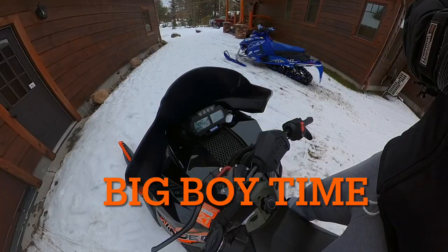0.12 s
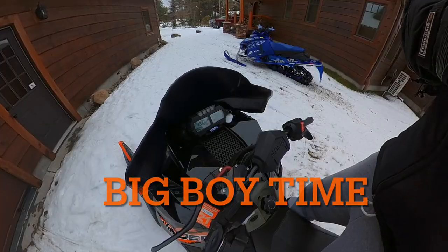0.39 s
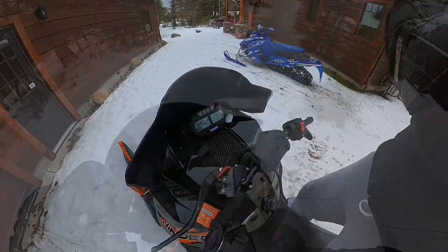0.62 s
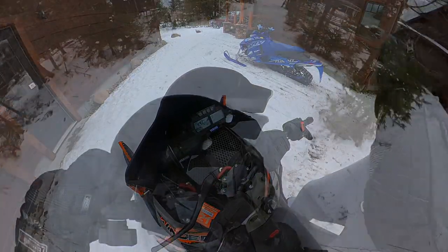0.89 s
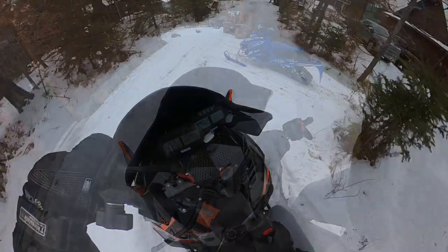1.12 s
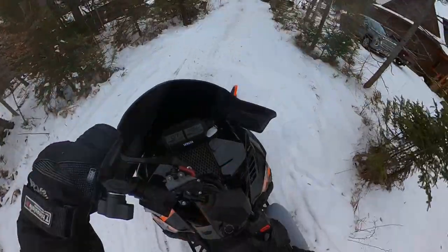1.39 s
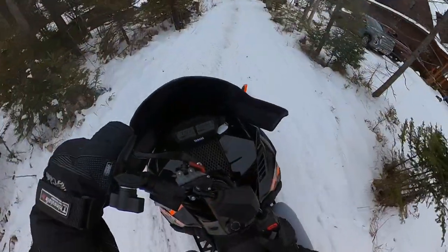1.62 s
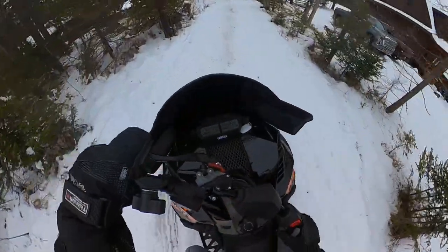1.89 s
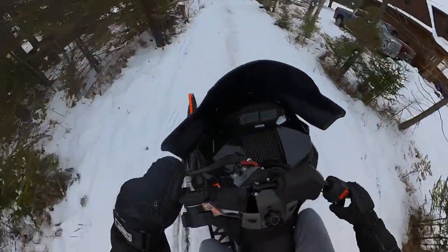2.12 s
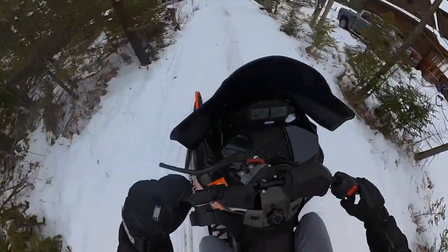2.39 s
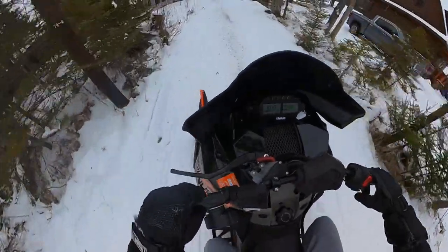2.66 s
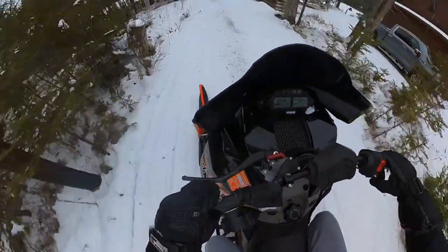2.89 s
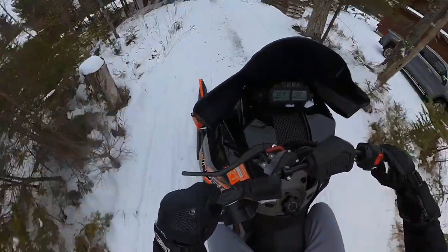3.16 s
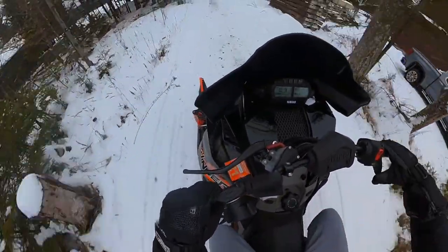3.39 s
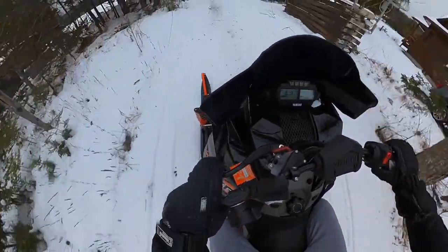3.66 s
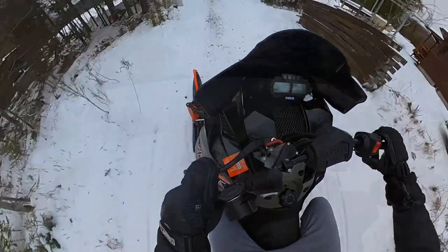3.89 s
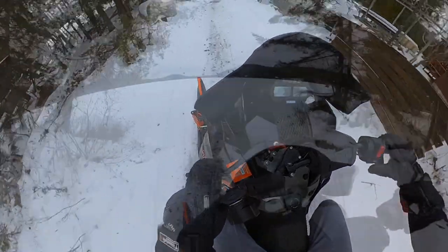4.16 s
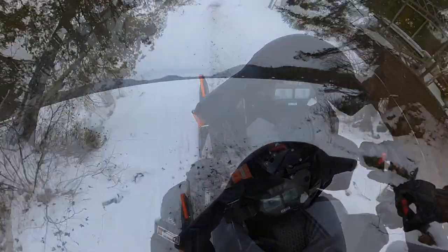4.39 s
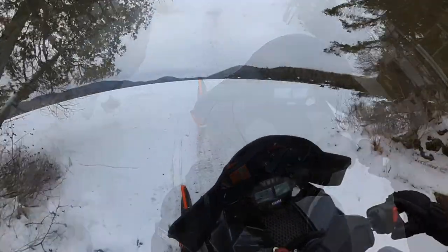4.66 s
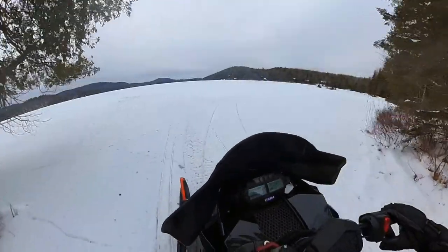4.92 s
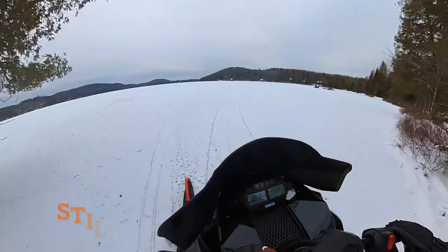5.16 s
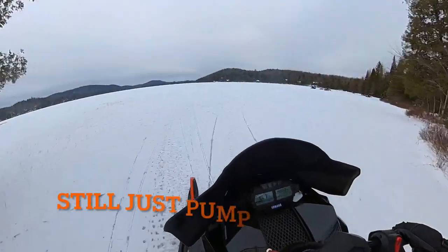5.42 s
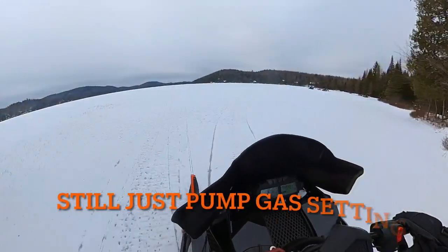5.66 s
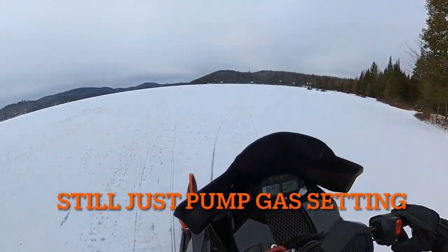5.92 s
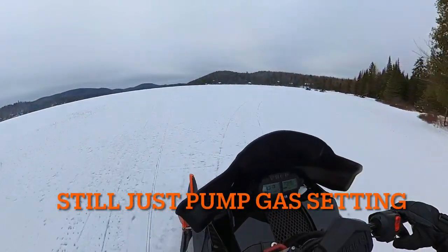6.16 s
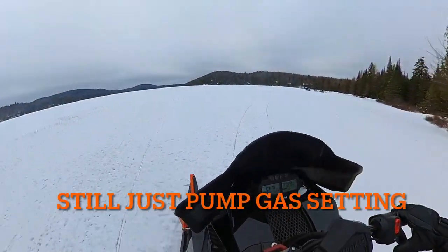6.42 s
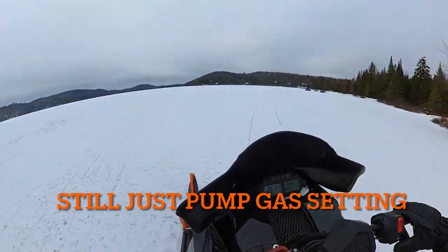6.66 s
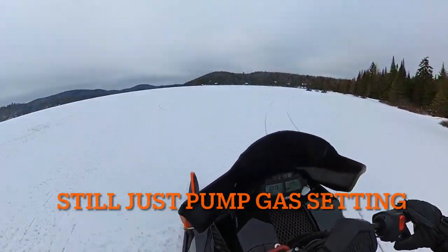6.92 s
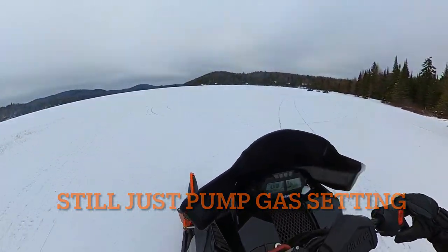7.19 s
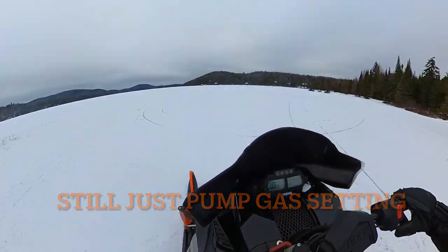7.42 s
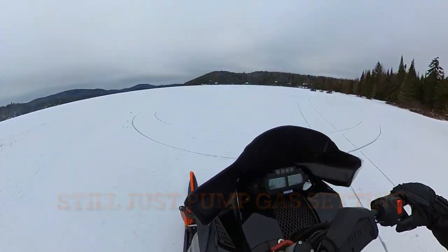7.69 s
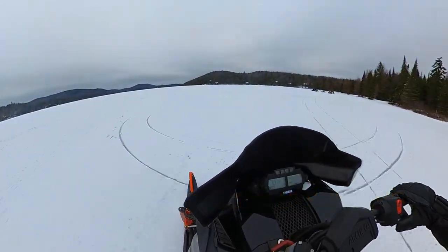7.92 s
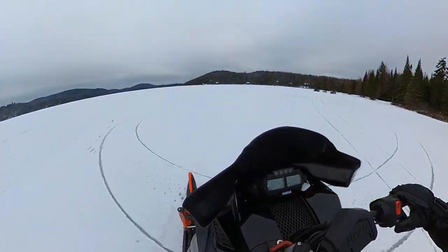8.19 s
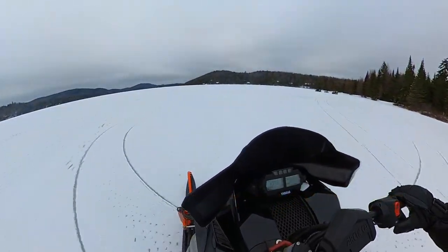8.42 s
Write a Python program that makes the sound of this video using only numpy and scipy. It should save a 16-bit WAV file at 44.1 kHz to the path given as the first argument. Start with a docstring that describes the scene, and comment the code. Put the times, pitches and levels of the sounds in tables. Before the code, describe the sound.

A three-cylinder snowmobile engine heard close from the rider's helmet outdoors. It idles low and steady with fading ticks, then blends into higher buzzing revs that surge, snarl and drop out abruptly. A second blend brings a deeper, rougher engine with repeated blips, track rumble, belt hiss and panel rattle, finally slowing to a ticking near-idle.

```python
"""A yard, a trail and a frozen lake, heard from the helmet of the rider of a three-cylinder four-stroke snowmobile.
Three passages fade into each other: idling, blipping the throttle, then blipping and slowing down.
The exhaust is a sum of tones at multiples and thirds of the firing rate, over a rough noise rumble.
Cowl rattle, belt drive, valve ticks and hiss are shaped noise; an intake whistle is a gliding tone.
The two channels carry one signal, except for a band of treble that differs from ear to ear."""
import sys
import numpy as np
from scipy import signal
from scipy.io import wavfile
from scipy.ndimage import uniform_filter1d

SR = 44100
rng = np.random.default_rng(int(sys.argv[2]) if len(sys.argv) > 2 else 0)


def decibels_to_gain(level_db):
    """Convert a level in decibels to a linear amplitude gain (20 dB per decade)."""
    exponent = np.asarray(level_db, float) / 20
    return 10 ** exponent


def log_audio(samples):
    """Write samples as a 16-bit WAV file to the path given in sys.argv[1]."""
    # one column per channel
    frames = np.atleast_2d(samples).T
    # limit to full scale, then quantise
    limited = np.clip(frames, -1, 1)
    pcm = np.round(limited * 32767).astype(np.int16)
    wavfile.write(sys.argv[1], SR, pcm)


N = 377496
T = np.arange(N) / SR  # time [s]

# engine in the yard: (time [s], firing rate [Hz], throttle [0 shut, 1 idling, 2 part, 3 wide], effort [dB])
IDLE = [(0, 45, 1.0, 0), (.3, 44.8, 1.0, 0), (.62, 44.1, 1.0, 0), (.92, 43.7, 1.0, 0), (1.3, 43.7, 1.0, 0)]


def evened(x):
    """Scales to rms 1."""
    return x / np.sqrt(np.mean(x ** 2) + 1e-20)


def read(points, hz):
    """Reads a spectrum on a log-frequency axis."""
    f, value = np.transpose(points)
    return np.interp(np.log(hz + 1), np.log(f + 1), value)


def wander(hz):
    """Slow chance of rms 1: straight lines between random knots, hz of them a second."""
    knots = rng.standard_normal(400)
    return np.interp(T * hz % 399, np.arange(400), knots) * np.sqrt(3 / 2)


def noise(points, modes=(), patchy_db=8.0, size=512):
    """Random short-time spectra of rms 1 with a colour, resonances added to it and drifting patches."""
    hz = np.fft.rfftfreq(size, 1 / SR)
    a, b = rng.standard_normal((N * 4 // size + 5, len(hz), 2), np.float32).T
    patches = rng.standard_normal(a.shape, np.float32)
    patches = uniform_filter1d(patches, size=7, axis=0)  # across frequency
    patches = evened(uniform_filter1d(patches, size=12, axis=1))  # across time
    power = decibels_to_gain(read(points, hz)) ** 2
    for f, width, db in modes:
        power += decibels_to_gain(db) ** 2 / (1 + (2 * (hz - f) / width) ** 2) ** 2
    z = (a + 1j * b) * np.sqrt(power)[:, None] * decibels_to_gain(patchy_db * patches)
    return evened(signal.istft(z, nperseg=size, noverlap=size * 3 // 4)[1][:N])


def ringing(early, late):
    """Noise through the early ringing modes before 2.3 s, then through the late ones."""
    floor = [(1, -80), (9000, -80)]
    early_ring, late_ring = (noise(floor, modes, patchy_db=2, size=2048) for modes in (early, late))
    return np.where(T < 2.3, early_ring, late_ring)


def puffs(turns, decay):
    """A gate that opens at each whole turn and dies away."""
    return np.exp(-(turns % 1) / decay)


def stumbles(spread):
    """Brief sags of the exhaust, one bell each: returns their sum, at most 1, and the dip in level [dB]."""
    # sags, mostly where the throttle changes:
    # (time [s], depth [dB], width before it is multiplied by spread [s])
    sags = [(2.927, -5.5, 0.035), (3.1, -6, 0.028), (3.545, -9, 0.025), (3.696, -6, 0.011),
            (3.76, -3, 0.025), (3.83, -5, 0.019), (3.875, -5, .025), (4.238, -3, .02), (4.31, -4.5, 0.044),
            (4.454, -5.5, 0.022), (4.544, -14, 0.021), (5.296, -3, 0.042), (5.43, -3, 0.018),
            (5.52, 0, 0.022), (5.8, -7.5, 0.041), (6.19, -1.5, 0.018), (6.475, -9.5, 0.036),
            (6.59, -5, 0.014), (7.84, -4, 0.018), (7.929, -7, 0.029), (7.969, -8, 0.015),
            (8.066, -6.5, 0.017), (8.172, -8, 0.018), (8.243, -7, .016)]
    bells = [np.exp(-(2 * (T - s) / (spread * width)) ** 2) for s, _, width in sags]
    dip_db = sum(row[1] * bell for row, bell in zip(sags, bells))
    return np.minimum(sum(bells), 1), dip_db


def ground_rumble():
    """Rough low noise from the track on the snow, rising and falling along the ride."""
    # rumble along the ride: (time [s], level [dB])
    ground = [(0, -41), (.6, -46), (1.05, -38), (1.45, -32.5), (1.64, -31), (1.75, -36.5), (2.24, -36),
              (2.41, -35), (2.5, -40), (3.03, -34.5), (3.15, -36), (3.53, -32), (3.77, -28), (3.86, -26),
              (4.05, -33.5), (4.72, -34.5), (4.96, -29.5), (5.27, -29.5), (5.46, -27), (5.55, -37),
              (5.75, -32), (6.15, -30.5), (6.45, -37), (6.56, -27), (6.67, -29.5), (7.03, -28), (7.37, -31),
              (7.6, -31), (7.84, -34), (7.92, -30), (8.1, -33), (8.56, -34)]
    # colour of the rumble: (frequency [Hz], relative density [dB per Hz])
    colour = [(15, -11.5), (30, -12.5), (60, 0), (140, 4.5), (250, -2.5), (400, -9.5), (700, -18),
              (1100, -26), (2000, -75.5)]
    level_db = np.interp(T, *np.transpose(ground)) + 0.97 * wander(hz=18)
    return decibels_to_gain(level_db) * noise(colour, patchy_db=1.5, size=2048)


def drags(free_db):
    """Each spell of belt drag takes the hiss over from its free-running level, arches, and lets go."""
    # spells when the belt drags and the hiss swells: (start [s], end [s], hiss level at mid-spell [dB])
    spells = [(0.447, 1.7, -47.5), (1.857, 2.31, -48), (2.702, 2.936, -51), (3.098, 3.554, -51.5),
              (3.75, 3.907, -49), (3.9, 4.298, -52), (4.681, 5.156, -43.5), (5.098, 5.355, -46.5),
              (5.482, 5.594, -51), (5.674, 6.18, -47), (6.569, 7.068, -46), (6.99, 7.38, -47.5)]
    rise_s, fall_s, arch_db = 0.032, 0.042, -2.5  # the arch is lower by arch_db at either end
    for start, end, db in spells:
        grip = np.clip(np.minimum((T - start) / rise_s, (end - T) / fall_s), 0, 1)
        arch = arch_db * (2 * (T - start) / (end - start) - 1) ** 2
        free_db = free_db + grip * (db + arch - free_db)
    return free_db


def hiss(hiss_db, throb, shake_db):
    """Treble noise of track and intake that throbs with the firings."""
    # colour of the hiss: (frequency [Hz], relative density [dB per Hz])
    colour = [(1000, -29.5), (1800, -8.5), (2500, -7), (3300, -2), (4200, -5), (5500, -7.5), (7100, -12),
              (8400, -25), (9100, -39.5), (11000, -68)]
    throbbing = evened(noise(colour, patchy_db=1.75) * (1 + .5 * throb))
    return decibels_to_gain(hiss_db + 0.2 * shake_db) * throbbing


def cowl_rattle(hiss_db, throb, shake_db):
    """Cowl panels shaken along with what makes the hiss: a throbbing clatter and their ringing modes."""
    # colour of the clatter: (frequency [Hz], relative density [dB per Hz])
    colour = [(300, -13), (450, 1), (700, 2.5), (1000, 0.5), (1600, 2), (1800, -9), (2500, -8.5),
              (3500, -34.5)]
    # panel modes before 2.3 s, then those after: (frequency [Hz], width [Hz], relative level [dB])
    early_modes = [(1182, 37, -2.5), (1510, 210, -5.5), (1653, 63, -15), (2073, 25, -8.5)]
    late_modes = [(1168, 32, -3.5), (1453.3, 34, 2.5), (1512, 100, -13), (2085, 40, -13.5)]
    rattle_db = -47.5 + .75 * (hiss_db + 51)
    clatter = evened(noise(colour, patchy_db=0.5) * (1 + 0.24 * throb))
    # the panels ring out more, the harder they are shaken
    buzz_db = -49.5 + 1.24 * (rattle_db + 47) + 0.47 * wander(hz=28.4)
    return decibels_to_gain(rattle_db + 0.37 * shake_db) * clatter + decibels_to_gain(buzz_db) * ringing(early_modes, late_modes)


def belt_drive(hiss_db, revs_hz):
    """Ringing of the dragging belt drive, strongest when the hiss is strong."""
    # drive modes before 2.3 s, then those after: (frequency [Hz], width [Hz], relative level [dB])
    early_modes = [(2760, 100, -8), (2960, 91, -10), (3350, 59, -7.5), (3730, 70, 1), (4150, 210, -9)]
    late_modes = [(2934, 110, -8.5), (3615, 64, -1.5), (3920, 72, -5.5), (5020, 54, -11)]
    drag_db = -54.5 + 1.0 * (hiss_db + 49) + 1.0 * wander(hz=21.7)
    drag_db -= 9 * np.clip((revs_hz - 114) / 12, 0, 1)  # the belt grips at high revs
    return decibels_to_gain(drag_db) * ringing(early_modes, late_modes)


def valve_ticks(valve):
    """Noise bursts of the valve gear in a small cover: faint every engine cycle, now and then strong."""
    # the loudest ticks as the engine slows: (time [s], level [dB])
    strong = [(7.559, -45.5), (7.7192, -56), (7.7892, -42), (7.865, -47.5), (7.9392, -48), (7.9729, -40),
              (8.076, -44.5), (8.19, -43), (8.35, -51), (8.5124, -43.5)]
    first_s, first_db, fade_db = .0149, -42.5, -3.2  # in the yard one tick a cycle stands out, ever less
    idle = []
    for k in range(8):
        idle.append((first_s + 3 * k / IDLE[1][1], first_db + fade_db * k + 3 * rng.standard_normal()))
    level = decibels_to_gain(-67 + 3 * wander(hz=7.8)) * evened(valve)
    for s, db in idle + list(strong):
        snap = np.exp(-abs(T - s) / 0.0019)
        tail = 0.54 * np.exp(-abs(T - s) / 0.022)
        level += decibels_to_gain(db) * (T > s) * (snap + tail) / 2
    cover_modes = [(4070, 880, 0), (5400, 300, -6)]  # (frequency [Hz], width [Hz], relative level [dB])
    return level * noise([(1, -19.0), (9000, -34.5)], cover_modes, size=128)


def intake_whistle():
    """A short rising whistle from the intake: one sine of unsteady pitch."""
    # glide of the whistle: (time [s], frequency [Hz], peak level [dB])
    glide = [(4.38, 4000, -70), (4.4, 4120, -57), (4.45, 4800, -54), (4.48, 4950, -55), (4.5, 5000, -75)]
    s, hz, db = np.transpose(glide)
    hz = np.interp(T, s, hz) * (1 + 0.024 * wander(hz=150))
    return decibels_to_gain(np.interp(T, s, db, -200, -200)) * np.sin(2 * np.pi * np.cumsum(hz) / SR)


def engine(rows, fades, rough, even_db, fifth_db=0):
    """Exhaust of one passage: tones at the orders (multiples of the firing rate) and at thirds of it.

    Also returns the count of firings, how much the passage is heard and its hiss level [dB]."""
    # throttle shut, idling, part, wide: (orders 1 to 5 [dB], unevenness of cylinders [dB], hiss [dB])
    voices = [(2.2, -23.5, -15, -13, 1, -43.5, -55.5), (2.2, 0.6, -0.8, -10.5, -10.5, -38, -61.5),
              (0.28, 1.46, -8.5, -3, -6.5, -36, -53), (2.6, 6, -2.5, -1.5, -4, -46, -52.5)]
    # what the exhaust lets through of orders 1 to 5: (frequency [Hz], level [dB])
    silencer = [(45, -34), (56, -39), (90, -30.5), (100, -31), (110, -25.5), (135, -23.5), (185, -27),
                (220, -30), (280, -34), (330, -37.5), (400, -39), (445, -50), (530, -49.5), (600, -54),
                (685, -45), (800, -68)]
    # exhaust above order 5: (frequency [Hz], level [dB])
    pipe = [(230, -50), (270, -51), (310, -55), (355, -46), (400, -56), (450, -68), (600, -90)]
    # lines of the uneven cylinders: (thirds of the firing rate [count], relative level [dB])
    uneven = [(1, -10), (2, -2.5), (4, 0), (5, -4.5), (7, -8), (8, -14), (10, -19), (11, -34.5),
              (13, -27.5), (14, -20.5)]
    s, row_hz, throttle, effort_db = np.transpose(rows)
    heard = np.interp(T, fades, [0, 1, 1, 0])
    smooth_hz = np.interp(T, s, row_hz)
    hz = smooth_hz * (1 + 0.00494 * wander(hz=25.054))
    throttle = np.interp(T, s, throttle)
    effort_db = np.interp(T, s, effort_db)
    *voice_db, uneven_db, hiss_db = (np.interp(throttle, range(len(voices)), c) for c in np.transpose(voices))

    orders_db = []
    for k, db in enumerate(voice_db):
        effort = (1 + 0.49 * k) * effort_db  # effort brightens: higher orders follow it more
        orders_db.append(db + read(silencer, (k + 1) * hz) + effort + 0.15 * k * rough * wander(hz=17))
    # orders 3 and 4 snarl while the revs climb
    climb = uniform_filter1d(np.gradient(smooth_hz) * SR, size=2000)  # [Hz per s]
    snarl_db = np.clip(0.12 * climb, 0, 3.5)
    orders_db[2:4] = [db + snarl_db for db in orders_db[2:4]]
    # the fifth order stands out near idle; the orders above it sink as the revs leave the idle
    revved = np.clip((hz - 61.5) / 8, 0, 1)
    orders_db[4] += fifth_db * (1 - revved)
    orders_db += [read(pipe, k * hz) - 12 * revved + 2.5 * wander(hz=6.9) for k in range(6, 10)]

    # around a stumble the cylinders fall out of step and the firings slip
    stumble, _ = stumbles(spread=1.35)
    uneven_db += 9.5 * stumble - even_db
    turns = np.cumsum(hz) / SR + .12 * stumble * wander(hz=45)
    load = np.clip((hz - 65) / 15, 0, 1)
    flip = np.pi * load - .6  # pulses point up near idle, down under load, and lean forward
    rough = rough * (.3 + .7 * load)  # the idle is steadier

    out = 0
    for k, db in enumerate(orders_db):
        out += decibels_to_gain(db + 0.65 * wander(hz=20)) * np.cos(2 * np.pi * (k + 1) * turns + flip)
    low_db = 0.1824 * np.maximum(hz - 105, 0)  # the lowest lines between the orders grow at high revs
    for thirds, db in uneven:  # the three cylinders differ, so lines appear between the orders
        drift = rng.uniform(0, 2 * np.pi) + rough * wander(hz=10)
        line_db = uneven_db + db + low_db * (thirds < 4.5) + 1.9 * rough * wander(hz=13)
        out += decibels_to_gain(line_db) * np.cos(2 * np.pi * thirds / 3 * turns + drift)
    # the hiss follows the throttle slowly, over 0.056 s
    return np.sqrt(2) * out * heard, turns, heard, uniform_filter1d(hiss_db, size=int(0.056 * SR))


def scene():
    """The passages share the noises, which throb with the firings of whichever passage is heard."""
    # engine on the trail, then on the lake: (time [s], firing rate [Hz],
    # throttle [0 shut, 1 idling, 2 part, 3 or more wide], effort [dB])
    trail = [(.5, 107.6, 1.7, -2.5), (1.0, 108.4, 1.2, -1.8), (1.58, 109.7, 1.92, -0.2),
             (1.86, 114.6, 2.25, 0), (2.13, 107.8, 1.9, -0.1), (2.32, 112.2, 2.7, -1.3),
             (2.45, 122.9, 2.76, -0.4), (2.55, 133.2, 2.03, 0.1), (2.61, 134.7, 2.45, -1),
             (2.85, 136.8, 1.91, 0.9), (2.9, 138.6, 0.57, -1.2), (2.94, 127, 0.11, -1.5),
             (3.03, 105.9, 0.13, -1.3), (3.06, 101.8, 1.8, -1), (3.12, 93.65, 1.5, 1),
             (3.15, 103.8, 2.4, 0.5), (3.29, 136, 3.0, .3), (3.41, 146.6, 3.0, 1.1),
             (3.51, 152.6, 5.8, 0.7), (3.55, 142, 0.36, -5.5), (3.59, 126.6, 0.11, -3),
             (3.66, 113.9, 0.19, .8), (3.72, 110.6, 1.9, -4.5), (3.86, 108.3, 2.5, -1),
             (3.92, 110, 2.1, 0.5), (4.06, 115.6, 2.8, -2.4), (4.2, 113.7, 2.1, -1.2),
             (4.27, 111, 4.8, -6.5), (4.6, 106.5, 0.53, 8)]
    lake = [(4.05, 88.5, 1.8, 4.5), (4.43, 84.7, 1.8, -.3), (4.54, 86.4, 1.9, -0.8), (4.64, 97.1, 2.1, 0.1),
            (4.84, 101.3, 2.1, 1.7), (5.08, 95.93, 2.1, 0.3), (5.27, 89.49, 2.2, -0.7),
            (5.46, 82.73, 1.9, 0.1), (5.51, 82.74, 0.22, -2.5), (5.56, 92.15, 3.0, -0.5),
            (5.61, 110.3, 3.0, -2), (5.67, 118.5, 2.8, -.3), (5.7, 120.6, 0.3, -8), (5.77, 102.7, 0.2, 4.7),
            (5.82, 95.6, 1.7, -2), (5.92, 91.4, 1.9, -1.4), (6.0, 90.6, 2.3, 0.4), (6.14, 91.1, 2.1, 1.7),
            (6.18, 88.6, 0.61, -2.5), (6.21, 88, 2.7, -.6), (6.24, 95.3, 3.0, -1), (6.36, 119.1, 3.0, -1.5),
            (6.46, 126.3, 2.6, -0.2), (6.48, 122.2, 0.1, 3.5), (6.54, 105.2, 0.2, -2),
            (6.59, 96.6, 1.9, 0.5), (6.68, 92.8, 2.1, 0.2), (7.02, 91.7, 2.1, 1.4), (7.2, 89.77, 2.1, 0.1),
            (7.56, 77.73, 1.8, -0.5), (7.86, 65.7, 1.3, -0.7), (8.06, 59.3, 1.1, -0.3),
            (8.2, 56.5, 1.1, -0.3), (8.56, 54.9, 1.1, -0.4)]
    # yard into trail, trail into lake: (start [s], end [s])
    fades = (.5, 1.365), (4.05, 4.6)
    first, second = map(tuple, fades)
    passages = [engine(IDLE, (-2, -1) + first, rough=0.4, even_db=8),
                engine(trail, first + second, rough=0.56, even_db=0.0),
                engine(lake, second + (9, 10), rough=.9, even_db=1.5, fifth_db=7.5)]
    exhaust = sum(p[0] for p in passages)
    throb = sum(heard * puffs(turns, decay=0.46) for _, turns, heard, _ in passages)
    # three firings make one engine cycle
    valve = sum(heard * puffs(turns / 3 - .25, decay=0.37) for _, turns, heard, _ in passages)
    revs_hz = sum(heard * np.gradient(turns) * SR for _, turns, heard, _ in passages)
    hiss_db = passages[0][2] * passages[0][3]  # no drag while standing
    hiss_db = hiss_db + sum(heard * drags(db) for *_, heard, db in passages[1:])
    shake_db = wander(hz=29.5)  # bumps shake panels and track together
    _, dip_db = stumbles(spread=0.96)

    mix = (ground_rumble() + exhaust) * decibels_to_gain(dip_db)
    mix += hiss(hiss_db, throb, shake_db) + cowl_rattle(hiss_db, throb, shake_db)
    mix += belt_drive(hiss_db, revs_hz) + valve_ticks(valve) + intake_whistle()
    return np.tile(mix, (2, 1))


def band_limit(x):
    """A steep low-pass at the top of the band."""
    return signal.sosfilt(signal.butter(12, 9190, fs=SR, output="sos"), x)


def record(dry):
    """The microphone rounds off peaks; one treble band differs between the ears; the top is cut off."""
    ceiling = 0.41  # full scale is 1
    hz, _, z = signal.stft(ceiling * np.tanh(dry / ceiling), SR, nperseg=512, boundary="even")
    # in this band each ear gets part of the sound with random phases of its own
    share = 0.34 * ((hz > 3050) & (hz < 6290))[:, None]
    own = abs(z) * np.exp(2j * np.pi * rng.random(z.shape))
    blend = np.sqrt(1 - share) * z + 1.39 * np.sqrt(share) * own
    wide = signal.istft(blend, SR, nperseg=512)[1][:, :N]
    low = signal.butter(10, 8800, fs=SR, output="sos")
    # 100-sample fades at both ends, against clicks
    fade = np.minimum(np.minimum(N - np.arange(N), np.arange(N)) / 100, 1)
    return band_limit(signal.sosfilt(low, wide) * fade)


dry = scene()
out = record(dry)
log_audio(out)
```